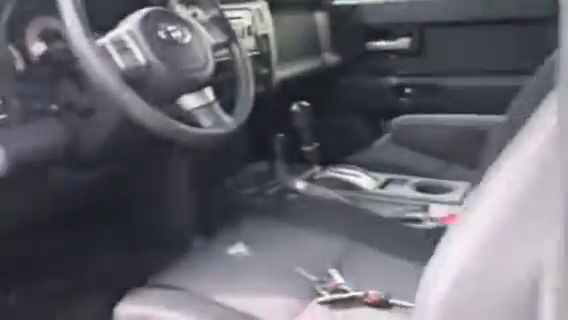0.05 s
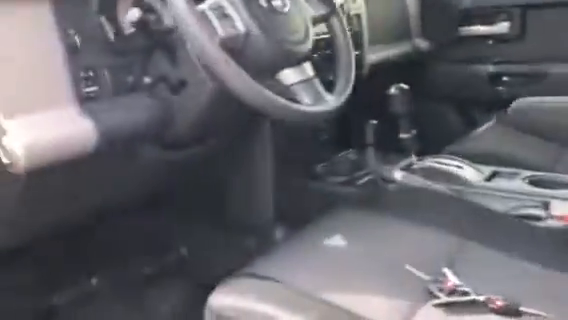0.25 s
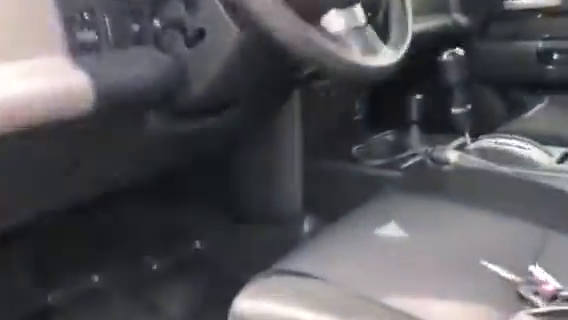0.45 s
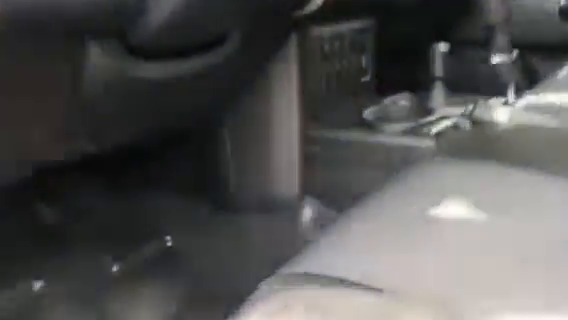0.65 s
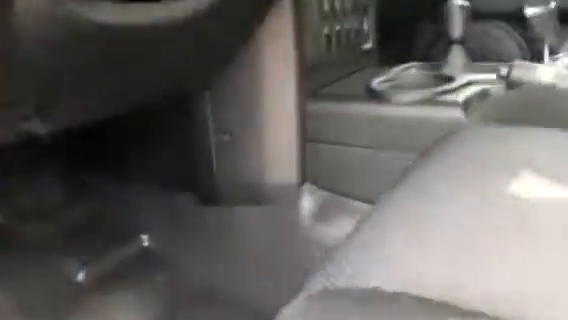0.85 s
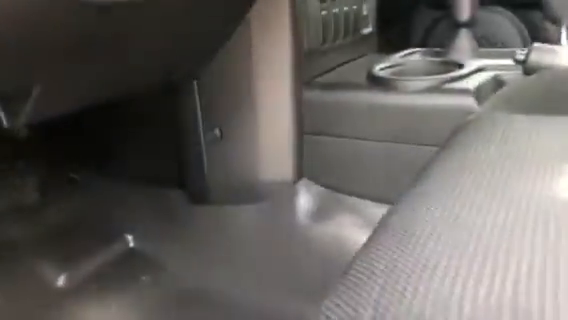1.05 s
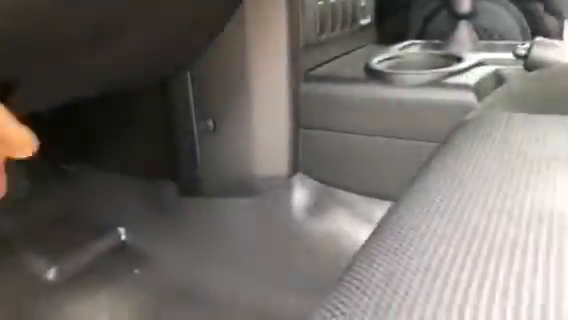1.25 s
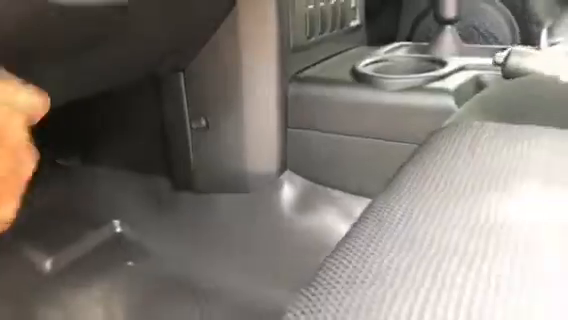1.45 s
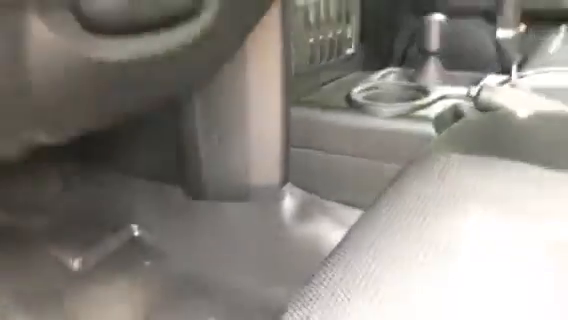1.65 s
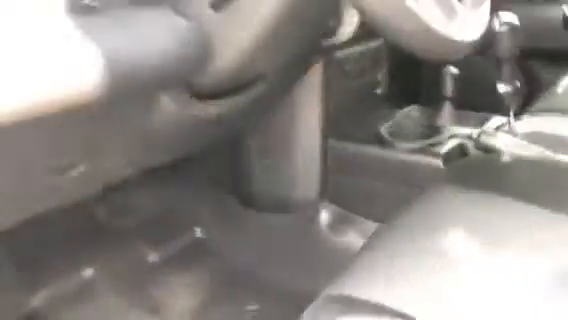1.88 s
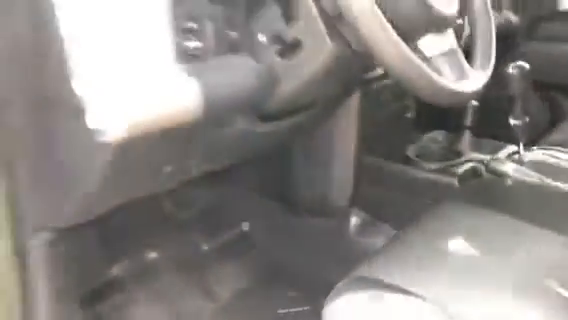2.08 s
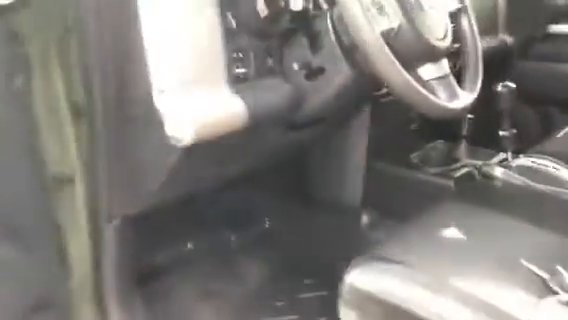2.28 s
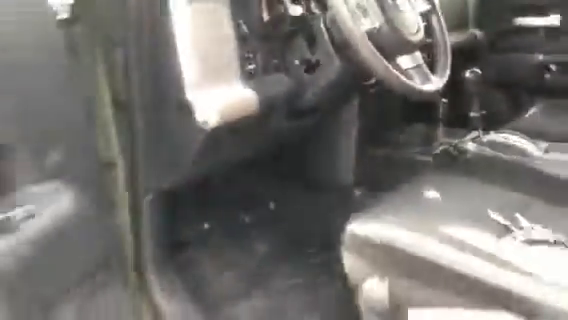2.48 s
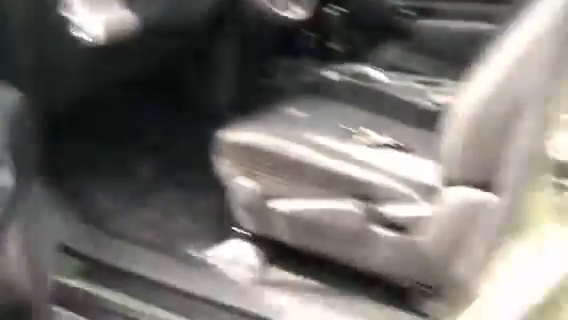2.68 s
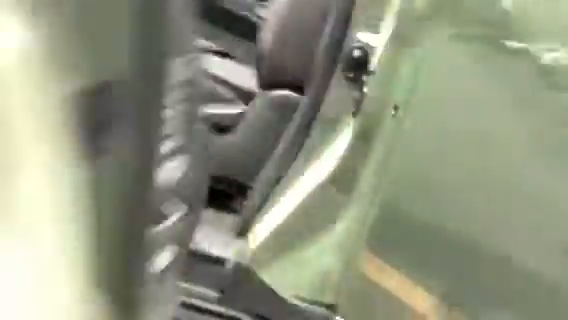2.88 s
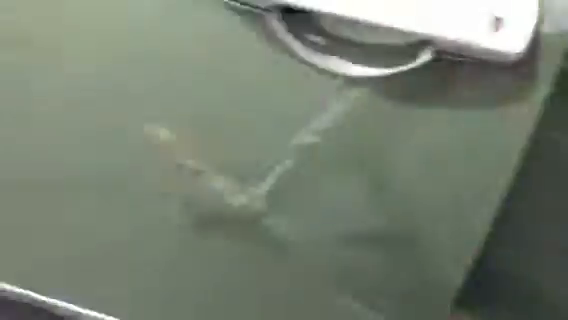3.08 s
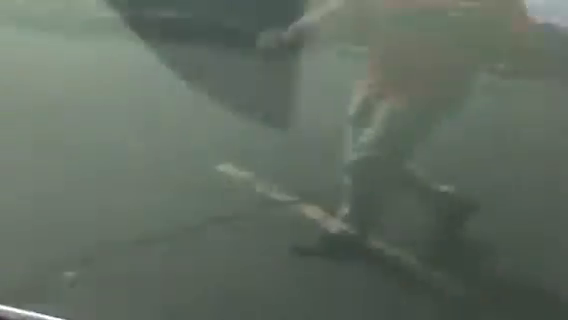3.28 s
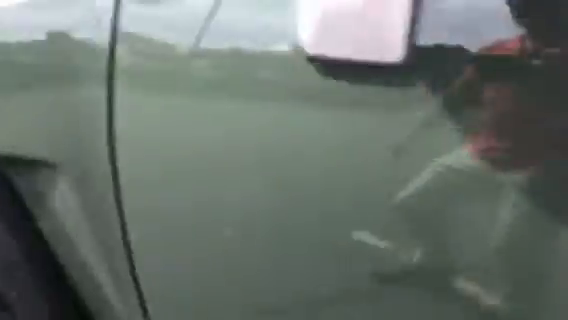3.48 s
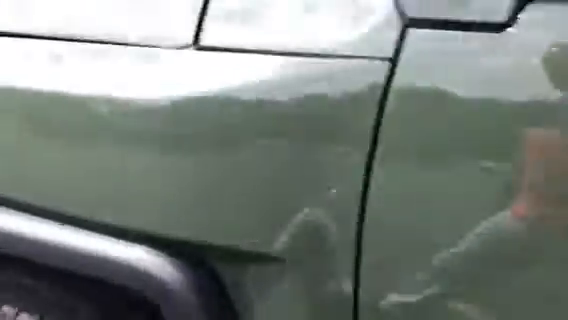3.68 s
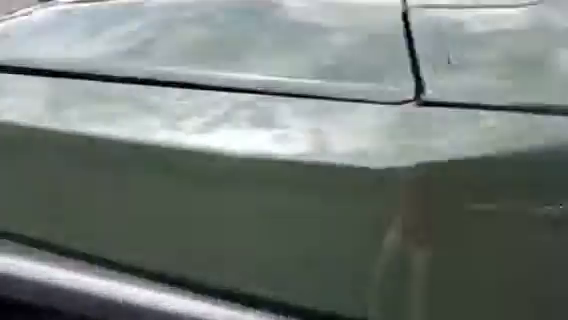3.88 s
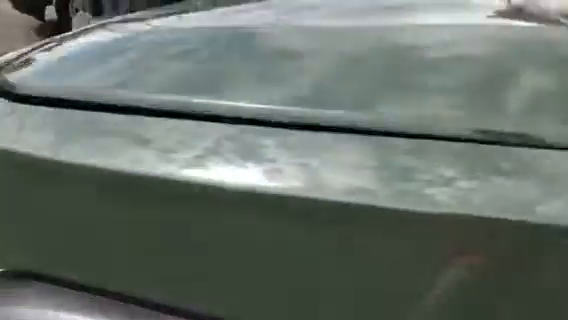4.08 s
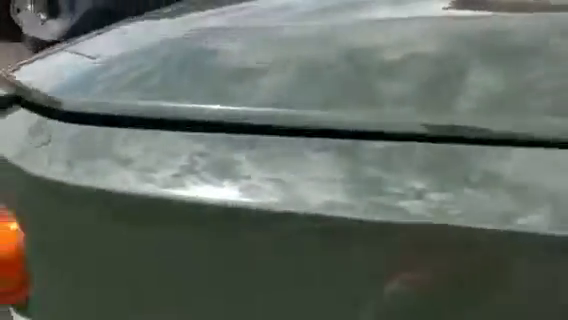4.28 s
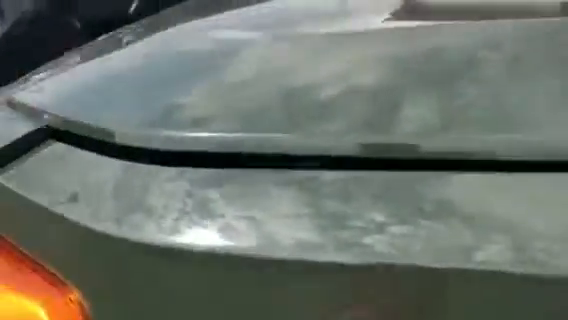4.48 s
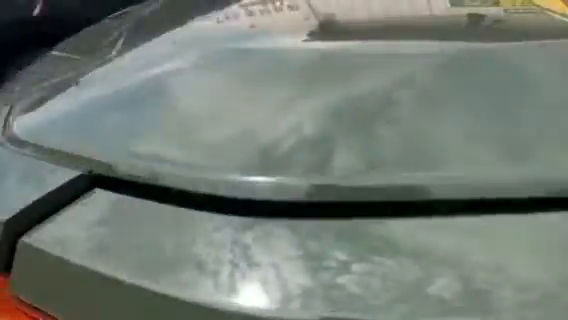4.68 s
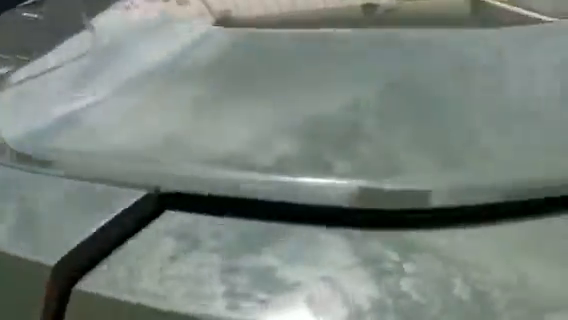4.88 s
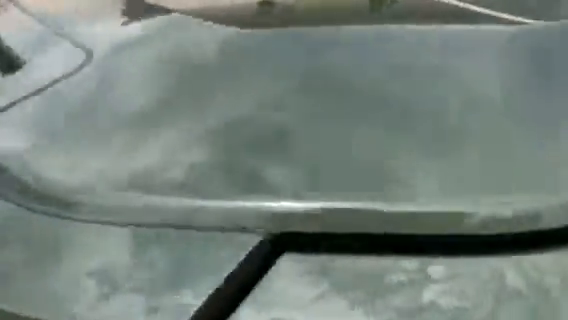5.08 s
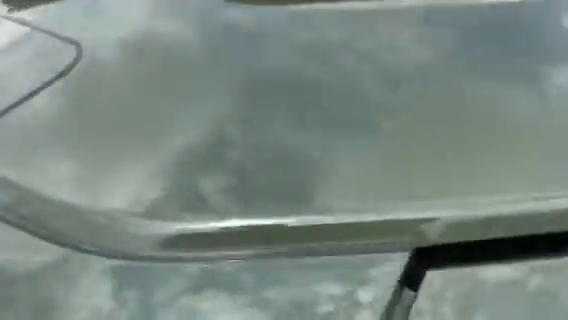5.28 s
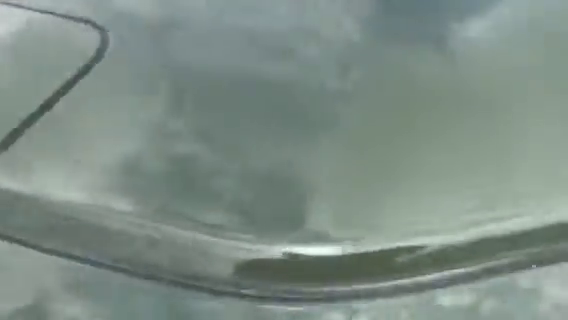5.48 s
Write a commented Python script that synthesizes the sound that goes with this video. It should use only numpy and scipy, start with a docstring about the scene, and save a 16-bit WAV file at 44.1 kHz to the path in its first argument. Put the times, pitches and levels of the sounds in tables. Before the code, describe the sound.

At a parked car outdoors, clothing brushes softly before a hood release lever is pulled: the latch springs with a thump and the plastic lever snaps back sharply. Clothes rustle, a hinge creaks faintly, and the door slams with a metallic ring over a boom. Wind then buffets the close, hand-held microphone, with distant traffic and faint insects behind.

```python
"""At a parked car, outdoors, on one hand-held microphone. Close by, someone leans in and pulls the hood
release: the latch springs with a thump and the plastic lever snaps back against the dashboard.
Clothes rustle, the door creaks faintly and is slammed, steel ringing over a boom. They walk to the
hood with wind buffeting the microphone port. Far off lie traffic and a faint insect chorus, with one
insect chirping nearer; all but the traffic's rumble are quieter from inside the cabin."""
import sys
import numpy as np
from scipy import signal
from scipy.fft import rfft, irfft, next_fast_len
from scipy.io import wavfile
from scipy.ndimage import uniform_filter1d

SR = 44100
rng = np.random.default_rng(int(sys.argv[2]) if len(sys.argv) > 2 else 0)


def waveform_to_disk(signal):
    """Save audio, clipped to [-1, 1], as 16-bit WAV at the path in sys.argv[1]."""
    frames = np.transpose(np.atleast_2d(signal))
    scaled = np.clip(frames, -1, 1) * 32767
    samples = np.round(scaled).astype(np.int16)
    wavfile.write(sys.argv[1], SR, samples)


N = 244446
TIME = np.arange(N) / SR

# lever taking up the cable, latch letting go: start_s, level_db, tilt_db_per_octave, length_factor
PULL_CONTACTS = [(1.266, -30.5, .5, 0.19), (1.327, -47, 2, 0.76), (1.350, -18.5, -1, 0.52),
                 (1.361, -23.5, 1, 0.83), (1.376, -29.5, -4, 1.65), (1.42, -45.5, -1.5, 6)]
PULL_COLOUR = [(88, -23), (150, -16), (406, -9), (689, -14.5), (805, -12), (1140, -7.5), (1260, -10.5),
               (1560, -6.5), (1870, -19), (2400, -8), (2700, -24), (3550, -18), (16000, -31.5)]   # frequency_hz, density_db
PULL_RING = [(200, 0.29), (1500, 0.14), (12000, 0.16)]   # frequency_hz, t60_s
# the lever's hollow plastic handle being jarred: start_s, level_db
LEVER_JOLTS = [(1.2645, -39.5), (1.327, -43.5), (1.3497, -20.5)]
LEVER_MODES = [(840, -17.5, 0.089), (940, 5.5, 0.023), (1530, -6.5, 0.14), (1593, 0.5, 0.052),
               (2270, -7, .05), (2460, 3, 0.027)]   # pitch_hz, level_db, t60_s
# the hood jumping on its spring: start_s, level_db
HOOD_JUMPS = [(1.353, -25.5), (1.367, -21)]
HOOD_MODES = [(72.2, -4, 0.27), (106, 2, 0.72), (168.5, 0, 0.15), (187, 1.5, 0.17), (251, -7, .18),
              (410.5, -9, 0.14), (648, -21, 0.38), (1005, -25.5, 0.38), (1163, -29, .2)]   # pitch_hz, level_db, t60_s
# lever snapping home and chattering: start_s, level_db, tilt_db_per_octave, length_factor
SNAP_CONTACTS = [(1.5246, -4.5, 0, 0.15), (1.529, -16, 0, 0.45), (1.5395, -18.5, -2, 0.62),
                 (1.547, -32.5, -2, 0.93), (1.575, -48, -1, 1.4)]
SNAP_COLOUR = [(120, -10.5), (200, -3), (659, -11), (933, -3.5), (1060, -5), (1210, -2), (1420, -14.5),
               (1940, -5.5), (2330, -5.5), (2510, -10), (2860, -9), (8580, -12.5), (11700, -21),
               (16000, -19)]   # frequency_hz, density_db
SNAP_RING = [(200, 0.16), (1500, 0.096), (12000, 0.13)]   # frequency_hz, t60_s
# the dashboard taking the snap: start_s, level_db
DASH_KNOCKS = [(1.525, -22), (1.539, -22)]
DASH_MODES = [(114, 2.5, 0.092), (209, -7.5, 0.029), (310, 1.5, 0.043), (1310, -9, 0.059), (1445, -22, .09),
              (4020, -20.5, .05)]   # pitch_hz, level_db, t60_s

# catch riding over the striker, door landing: start_s, level_db, tilt_db_per_octave, length_factor
SLAM_CONTACTS = [(3.215, -15, 1.5, 0.9), (3.2185, -12, 0.5, 0.38), (3.226, -14.5, -11, 0.65),
                 (3.2335, -4.5, 2.5, 0.26), (3.238, -16, -17, 0.22), (3.2578, -9.5, 2.5, 0.21),
                 (3.267, -8, -.5, 0.45)]
SLAM_COLOUR = [(88, -32), (150, -1.5), (321, -8.5), (601, -4), (716, -10.5), (998, -3.5), (1240, -15.5),
               (1390, -14.5), (1600, -11.5), (2020, -25), (2700, -21), (4670, -30), (6910, -31),
               (16000, -48.5)]   # frequency_hz, density_db
SLAM_RING = [(200, 0.3), (1000, 0.11), (4000, 0.2), (12000, 0.17)]   # frequency_hz, t60_s
# the steel catch clacking shut in two stages: start_s, level_db
CATCH_CLACKS = [(3.2152, -19.5), (3.2338, -21)]
CATCH_MODES = [(2280, 6, 0.041), (2570, 1, 0.044), (2760, -3.5, 0.069), (2800, -9, 0.06),
               (3260, -3.5, 0.065), (5540, -14, .04), (6870, -6, 0.041), (7040, -16, 0.043)]   # pitch_hz, level_db, t60_s
# the striker setting the door's steel skin ringing: start_s, level_db
SKIN_BLOWS = [(3.2345, -19.5)]
SKIN_MODES = [(481, 1, .3), (762, -4, .3), (905, -1, .24), (1009, 0, .26), (1068, -3, .22), (1167, -2, .2),
              (1250, 0, .2), (1501, -8, .19), (1636, -7, .18), (1696, -9, .18), (1762, -9, .18),
              (1958, -10, .17), (2261, -8, .16), (2758, -7, .16)]   # pitch_hz, level_db, t60_s
# the door shell and the cabin air taking the blow: start_s, level_db
SHELL_BLOWS = [(3.2475, -11), (3.274, -13.5)]
SHELL_MODES = [(46.3, -10, 0.14), (79.7, -1.5, 0.13), (131, -2, 0.15), (175.5, 4.5, 0.38),
               (231.6, -7.5, 0.37), (284, -12, 0.2)]   # pitch_hz, level_db, t60_s
# resonances of the door hinge: pitch_hz, level_db, t60_s
HINGE_MODES = [(534, 11, 0.067), (957, 2.5, 0.13), (1083, 4, 0.079), (1406, -11.5, 0.39), (1650, 0.5, 0.13),
               (2200, 1.5, 0.061)]

# gusts right on the microphone, from the swinging door and the open air: start_s, length_s, level_db
GUSTS = [(0, 0.058, -31.5), (0.077, .08, -37), (1.038, 0.048, -37.5), (2.889, 0.018, -33),
         (3.043, .045, -33.5), (3.100, 0.034, -18), (3.177, 0.032, -15.5), (3.356, 0.088, -21),
         (3.496, 0.047, -28.5), (4.432, 0.049, -31.5), (4.558, .3, -33), (4.874, 0.031, -25),
         (4.922, 0.029, -20.7), (4.990, 0.039, -19), (5.05, 0.042, -24.5), (5.128, 0.032, -24),
         (5.196, .075, -23.5), (5.398, 0.014, -25), (5.443, 0.022, -21.5)]
# lone eddies popping on the microphone port: time_s, peak_db
EDDIES = [(0.02, -21), (0.138, -25.5), (0.198, -26.5), (0.486, -27), (3.117, -8), (3.183, -3.5),
          (3.194, -4), (3.2585, 0), (3.411, -12.5), (3.916, -24), (4.12, -29), (4.824, -23), (5.02, -11.5),
          (5.142, -15), (5.186, -4.5), (5.261, -13), (5.402, -13.5), (5.455, -10.5), (5.489, -18.5)]
# the port's response to wind: frequency_hz, gain_db
PORT_COLOUR = [(40, 10), (90, -3.5), (170, 0), (280, -2), (480, 2), (900, 4.5), (1600, 5)]

# a sleeve brushing along as the arm reaches under the dashboard: start_s, length_s, level_db
SLEEVE_STROKES = [(0.595, 0.035, -61), (0.865, 0.083, -52), (1.035, 0.082, -53.5), (1.15, 0.11, -61)]
SLEEVE_COLOUR = [(800, -13), (1700, -2.5), (2500, -1), (3600, -2), (4800, -7), (8000, -12), (10500, -6),
                 (13500, -11), (16000, -13)]   # frequency_hz, density_db
# trousers sliding over the seat and sill: start_s, length_s, level_db
TROUSER_STROKES = [(1.045, 0.25, -60.5), (1.41, 0.16, -55), (1.745, 0.013, -54.5), (1.942, 0.029, -56),
                   (2.157, 0.246, -47), (5.322, 0.072, -52.5)]
TROUSER_COLOUR = [(710, -38), (1200, -16), (1540, -8), (1630, -5.5), (2650, -2), (3400, -2), (6800, -6.5),
                  (8260, -6.5), (16000, -22.5)]   # frequency_hz, density_db
# seams catching on the plastic trim: start_s, level_db
SEAM_SNAGS = [(1.985, -53), (2.212, -43), (2.226, -52), (2.287, -47), (2.301, -38), (2.312, -44.5),
              (2.496, -60)]
TRIM_MODES = [(1910, -8.5, 0.047), (2340, 4.5, 0.029), (2670, 3.5, 0.063), (2950, -2, 0.055),
              (4300, -12, 0.057)]   # pitch_hz, level_db, t60_s
# small knocks of hands and feet: start_s, level_db, tilt_db_per_octave, length_factor
TAP_CONTACTS = [(0.803, -20.5, -7, 0.2), (0.825, -41.5, -3, .95), (1.133, -33, -10.5, 1),
                (1.637, -28, -9.5, 0.27), (1.941, -44.5, 6.5, .8), (1.955, -41, -0.5, 0.79),
                (2.3005, -44.5, 2, 0.53), (2.492, -36, 2.5, 0.49), (2.883, -33.5, -3.5, 0.92)]
TAP_COLOUR = [(150, -20.5), (300, -6), (520, 8.5), (800, -2.5), (1300, 0.5), (2500, -11), (5000, -15),
              (9000, -42), (16000, -40)]   # frequency_hz, density_db
TAP_RING = [(200, 0.079), (2000, 0.12), (12000, 0.22)]   # frequency_hz, t60_s

# how open the microphone is to the outdoors, lowest inside the cabin: time_s, openness_db
OPENNESS = [(0, -6.5), (1.9, -9.5), (2.5, -4.3), (2.95, -0.5), (3.85, 0), (4.4, -2.5), (5.54, -3.5)]
# distant traffic, its rumble (also the wind's buffeting) and its wash: frequency_hz, density_db
RUMBLE_COLOUR = [(25, -17), (38, -7.5), (52, -1), (80, 1), (120, -4.5), (200, -8.5), (300, -16.5),
                 (500, -60.5)]
WASH_COLOUR = [(150, -20.5), (300, -0.5), (600, 0.5), (1000, -3.5), (2000, -13), (4000, -21), (6500, -46),
               (9000, -35), (15000, -68)]
# the far chorus in the trees and the one nearer insect: frequency_hz, density_db
CHORUS_COLOUR = [(2200, -16.5), (3600, 1), (4400, -1.5), (5300, 2), (6600, -2.5), (8500, -9.5),
                 (14000, -18.5), (16000, -18)]
CHIRP_COLOUR = [(2900, -29), (3500, -1.5), (4300, -17), (4850, 0.5), (5200, 3), (5750, -10), (6400, -3),
                (7500, -17), (9000, -26), (15000, -22)]

# third-octave bands: centre_hz, width_hz, filter
EDGES_HZ = 25 * 2 ** np.arange(0, 9.5, 1 / 3)
BANDS = [(np.sqrt(lo * hi), hi - lo, signal.butter(2, [lo, hi], "band", fs=SR, output="sos"))
         for lo, hi in zip(EDGES_HZ, EDGES_HZ[1:])]


def hood_release():
    """The cable trips the latch, the hood jumps, and the lever flies back against the dashboard."""
    pull = clatter(PULL_CONTACTS, PULL_COLOUR, PULL_RING)
    handle = struck(LEVER_JOLTS, LEVER_MODES, contact_s=0.00088)
    thump = struck(HOOD_JUMPS, HOOD_MODES, contact_s=0.0085)
    snap = clatter(SNAP_CONTACTS, SNAP_COLOUR, SNAP_RING)
    dashboard = struck(DASH_KNOCKS, DASH_MODES, contact_s=0.0014)
    return pull + handle + thump + snap + dashboard


def door_slam(rattle_s=3.287, gap_s=.0245, rattle_db=-14, loss_db=4, tilt_db_per_octave=-2, length=.75):
    """The catch hits the striker, the skin rings, the shell booms and the panels rattle ever weaker."""
    rattle = [(rattle_s + k * gap_s, rattle_db - k * loss_db, tilt_db_per_octave, length)
              for k in range(3)]
    clash = clatter(SLAM_CONTACTS + rattle, SLAM_COLOUR, SLAM_RING)
    catch = struck(CATCH_CLACKS, CATCH_MODES, contact_s=0.0011)
    skin = struck(SKIN_BLOWS, SKIN_MODES, contact_s=0.0022)
    shell = struck(SHELL_BLOWS, SHELL_MODES, contact_s=0.00083)
    return clash + catch + skin + shell


def hinge_creak(start_s=2.533, gap_s=.0265, middle_db=-47.5, ends_db=-5.5, scatter_db=3.5):
    """The hinge slips in even steps, each with its own pitch and mix of modes as the load shifts."""
    out = np.zeros(N)
    hz, mode_db, t60 = np.transpose(HINGE_MODES)
    for k, place in enumerate(np.linspace(-1, 1, 5)):
        slip_hz = hz * (1 + .03 * rng.standard_normal(len(hz)))
        slip_db = mode_db + scatter_db * rng.standard_normal(len(hz))
        slip = (start_s + k * gap_s, middle_db + ends_db * place ** 2)
        out += struck([slip], np.transpose([slip_hz, slip_db, t60]), contact_s=0.0025)
    return out


def clatter(contacts, colour, ring):
    """Each contact sets a dense cloud of resonances ringing, which dies band by band."""
    out, t = np.zeros(N), TIME[:SR // 2]
    centres, widths = np.array([band[:2] for band in BANDS]).T
    for start_s, level_db, tilt_db, length in contacts:
        gains = from_db(at_hz(colour, centres) + tilt_db * np.log2(centres)) * np.sqrt(widths)
        gains = gains / np.linalg.norm(gains) * from_db(level_db)
        white = rng.standard_normal((2, len(t)))   # neighbouring bands get unrelated noise
        for k, (hz, _, sos) in enumerate(BANDS):
            t60 = max(at_hz(ring, hz) * length, 1e-3)
            decay = np.exp(-np.log(1000) * t / t60) + 1e-12
            band = signal.sosfilt(sos, white[k % 2] * decay)
            add(out, start_s, gains[k] * band * np.linalg.norm(decay) / np.linalg.norm(band))
    return out


def struck(blows, modes, contact_s):
    """Blows ring the separate modes of a body; a soft contact lets them build up."""
    out, t = np.zeros(N), TIME[:SR]
    hz, mode_db, t60 = np.transpose(modes)[:, :, None]
    partials = from_db(mode_db) * np.sin(2 * np.pi * hz * t) * np.exp(-np.log(1000) * t / t60)
    ringing = partials.sum(axis=0) * (1 - np.exp(-t / contact_s))
    for start_s, level_db in blows:
        add(out, start_s, from_db(level_db) * ringing)
    return out


def gusts(bright_hz=670, db_per_octave=13.5, lumpy_db=3.5, lumps_per_s=220, buffet_db=-11.5):
    """Lumpy turbulence on the microphone, brighter the harder it blows, over a slow deep buffeting."""
    out, flow = np.zeros(N), np.zeros(N)
    t = TIME[:SR // 2] - .1
    for start_s, length_s, level_db in GUSTS:
        shape = swell(t, length_s, attack_s=0.0083, fade_db_per_s=6, release_s=0.0075)
        envelope = from_db(level_db) * shape
        turbulence = rng.standard_normal(len(t)) * from_db(lumpy_db * drift(lumps_per_s, len(t)))
        gust = microphone_port(envelope * turbulence, bright_hz * 2 ** (level_db / db_per_octave))
        add(out, start_s + t[0], gust * np.linalg.norm(envelope) / np.linalg.norm(gust))
        add(flow, start_s + t[0], envelope)
    slow_flow = uniform_filter1d(flow, int(.3 * SR))
    buffet = slow_flow * coloured(rng.standard_normal(N), RUMBLE_COLOUR)
    return out + from_db(buffet_db) * buffet


def eddies(bright_hz=500, db_per_octave=17, front_db=5):
    """Eddies, alone or at the front of each gust, are single pressure pulses, sharper when stronger."""
    out, size = np.zeros(N), SR // 2
    pulse = signal.unit_impulse(size, "mid")
    fronts = [(start_s, level_db + front_db) for start_s, _, level_db in GUSTS]
    for time_s, peak_db in EDDIES + fronts:
        pop = microphone_port(pulse, bright_hz * 2 ** (peak_db / db_per_octave))
        add(out, time_s - size / 2 / SR, from_db(peak_db) * pop / np.abs(pop).max())
    return out


def microphone_port(pressure, bright_hz, bass_cut_hz=122.4):
    """An eddy's size limits its treble; the port's steep bass cut makes it ring."""
    hz = np.fft.rfftfreq(len(pressure), 1 / SR)
    response = np.exp(-hz / bright_hz) * from_db(at_hz(PORT_COLOUR, hz))
    smooth = irfft(rfft(pressure) * response, len(pressure))
    return signal.sosfilt(signal.butter(3, bass_cut_hz, "high", fs=SR, output="sos"), smooth)


def person(snag_db=1, snag_decay_s=0.0094):
    """Close up, cloth slides, caught seams let go in bursts, and hands and feet knock on the trim."""
    friction = fibres(grain_db=2.5, grains_per_s=800, patchy_db=4.0, shifts_per_s=60)
    snags = np.zeros(N)
    burst = np.exp(-TIME[:SR // 10] / snag_decay_s)
    for start_s, level_db in SEAM_SNAGS:
        add(snags, start_s, from_db(level_db + snag_db) * burst)
    sleeve = strokes(SLEEVE_STROKES) * coloured(friction[::-1], SLEEVE_COLOUR)   # same weave, new grains
    trousers = (strokes(TROUSER_STROKES) + snags) * coloured(friction, TROUSER_COLOUR)
    trim = struck(SEAM_SNAGS, TRIM_MODES, contact_s=0.00053)
    taps = clatter(TAP_CONTACTS, TAP_COLOUR, TAP_RING)
    return sleeve + trousers + trim + taps


def fibres(grain_db, grains_per_s, patchy_db, shifts_per_s):
    """Threads catch and slip in tiny uneven bursts; the colour shifts as the folds move."""
    hiss = rng.standard_normal((2, N)) * from_db(grain_db * drift(grains_per_s))
    return sum(signal.sosfilt(sos, hiss[k % 2]) * from_db(patchy_db * drift(shifts_per_s))
               for k, (_, _, sos) in enumerate(BANDS))


def strokes(rows):
    """Level of sliding cloth: each stroke starts briskly, slows and stops."""
    out, t = np.zeros(N), TIME[:SR // 2] - .1
    for start_s, length_s, level_db in rows:
        shape = swell(t, length_s, attack_s=0.0074, fade_db_per_s=12.5, release_s=0.021)
        add(out, start_s + t[0], from_db(level_db) * shape)
    return out


def traffic(open_db, rumble_db=-45.5, wash_db=-49.5, shielding=0.64):
    """Distant traffic: a low rumble that goes through everything, and a wash that the car shields."""
    rumble = coloured(rng.standard_normal(N), RUMBLE_COLOUR)
    wash = coloured(rng.standard_normal(N), WASH_COLOUR)
    return from_db(rumble_db) * rumble + from_db(wash_db + shielding * open_db) * wash


def insects(open_db, far_db=-59.5, near_db=-61.5, near_shielding=3.1, pairs_per_s=12.1):
    """A smooth far chorus, and a nearer insect, more shadowed by the car, chirping in strong-weak pairs."""
    cycles = pairs_per_s * TIME + .04 * drift(3)
    swing = np.cos(2 * np.pi * cycles)
    chirps = swing ** 8 * (1 + .3 * swing)
    near = rms_one(chirps) * coloured(rng.standard_normal(N), CHIRP_COLOUR)
    far = coloured(rng.standard_normal(N), CHORUS_COLOUR)
    return from_db(far_db + open_db) * far + from_db(near_db + near_shielding * open_db) * near


def swell(t, length_s, attack_s, fade_db_per_s, release_s):
    """Rise up to time zero, hold while fading slowly, then die away."""
    edges = np.exp(np.minimum(t, 0) / attack_s - np.maximum(t - length_s, 0) / release_s)
    return from_db(-fade_db_per_s * np.clip(t, 0, length_s)) * edges + 1e-12


def coloured(hiss, colour):
    """Give a steady hiss a spectrum; rms 1."""
    size = next_fast_len(N, True)
    gains = from_db(at_hz(colour, np.fft.rfftfreq(size, 1 / SR)))
    return rms_one(irfft(rfft(hiss, size) * gains, size)[:N])


def drift(rate, size=N):
    """A random wander that heads for a new value rate times a second."""
    knots = rng.standard_normal(size // 10)
    return np.interp(TIME[:size] * rate, np.arange(len(knots)), knots)


def at_hz(points, hz):
    """Read a table on a log-frequency axis."""
    points_hz, values = np.transpose(points)
    return np.interp(np.log(hz + 1e-9), np.log(points_hz), values)


def add(out, start_s, sound):
    """Mix a sound in, starting at start_s."""
    start = int(round(start_s * SR))
    lo, hi = max(start, 0), min(start + len(sound), N)
    out[lo:hi] += sound[lo - start:hi - start]


def from_db(db):
    """Decibels to gain."""
    return np.exp(np.asarray(db) * np.log(10) / 20)


def rms_one(x):
    """Scale to unit rms."""
    return x / np.sqrt(np.mean(x ** 2) + 1e-20)


def scene():
    """Everything at the one microphone, from the car close by to the far background."""
    open_db = np.interp(TIME, *np.transpose(OPENNESS))
    close = hood_release() + door_slam() + hinge_creak() + gusts() + eddies() + person()
    return (close + traffic(open_db) + insects(open_db))[None]


def record(dry, bass_cut_hz=39, ceiling=.72, treble_cut_hz=15900):
    """The recorder loses the deepest bass, rounds off the loudest peaks and cuts the top."""
    thinned = signal.sosfilt(signal.butter(7, bass_cut_hz, "high", fs=SR, output="sos"), dry)
    rounded = thinned / (1 + (thinned / ceiling) ** 4) ** (1 / 4)
    return signal.sosfilt(signal.ellip(10, .2, 80, treble_cut_hz, fs=SR, output="sos"), rounded)


dry = scene()
out = record(dry)
waveform_to_disk(out)
```